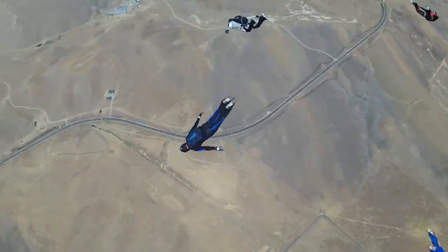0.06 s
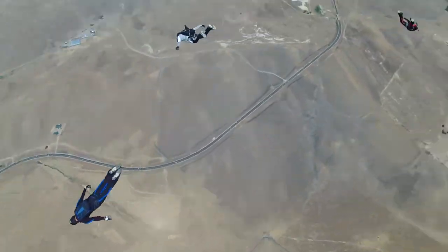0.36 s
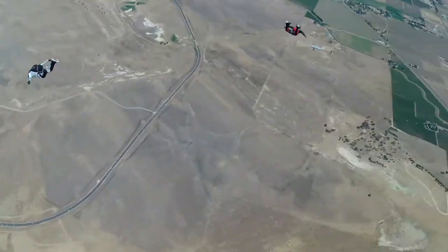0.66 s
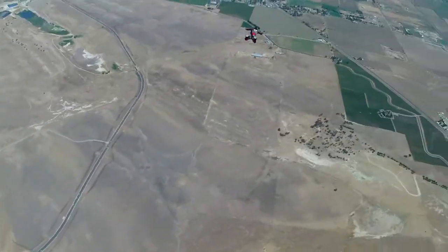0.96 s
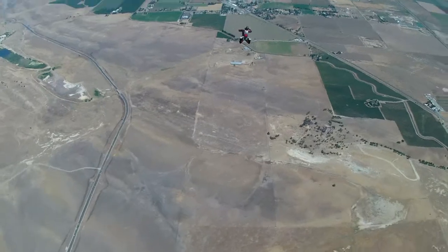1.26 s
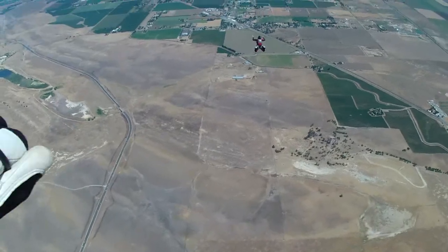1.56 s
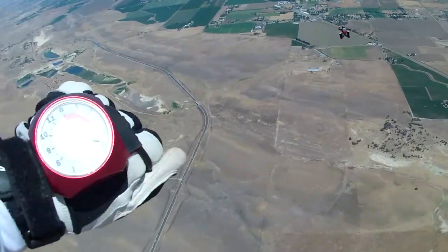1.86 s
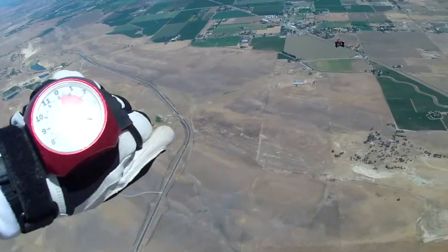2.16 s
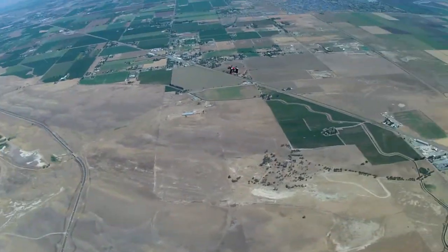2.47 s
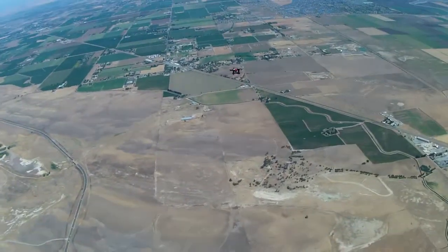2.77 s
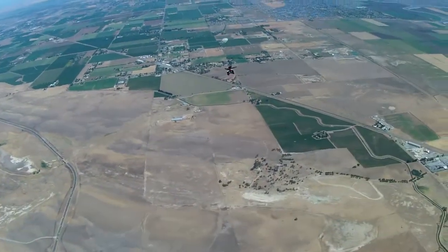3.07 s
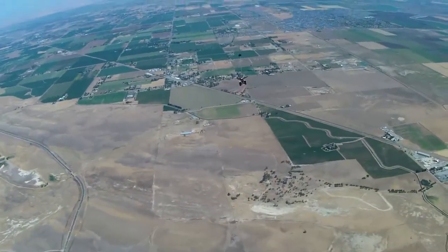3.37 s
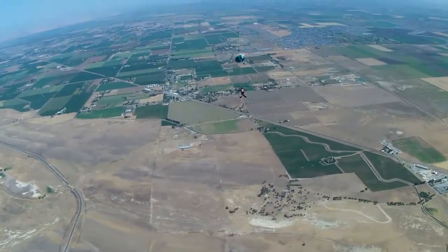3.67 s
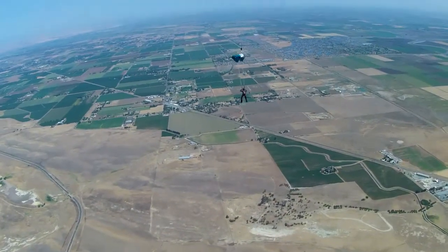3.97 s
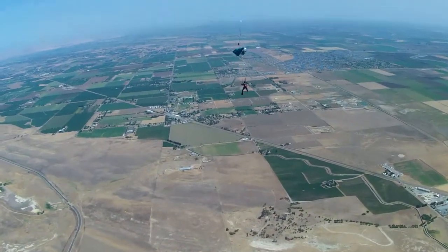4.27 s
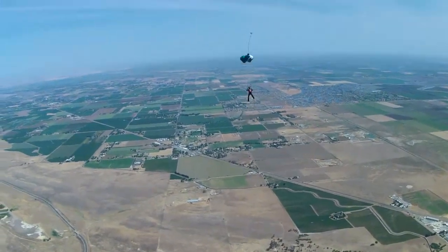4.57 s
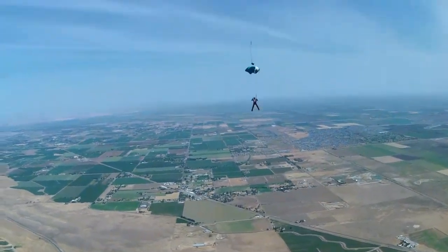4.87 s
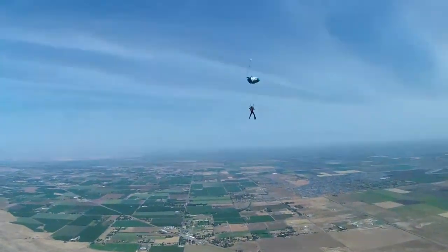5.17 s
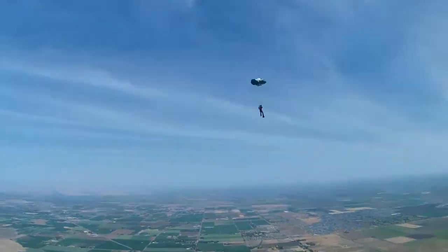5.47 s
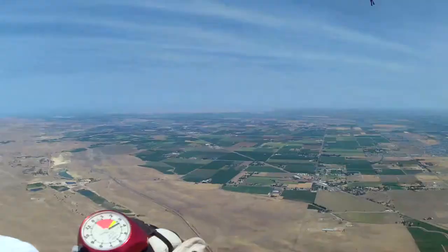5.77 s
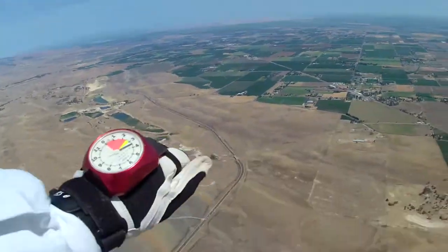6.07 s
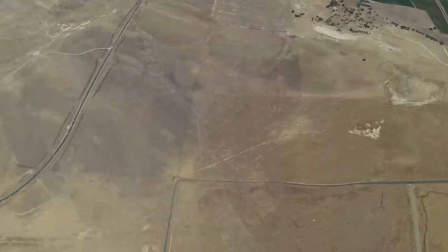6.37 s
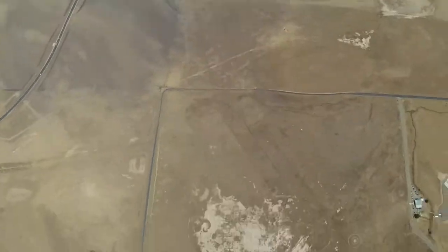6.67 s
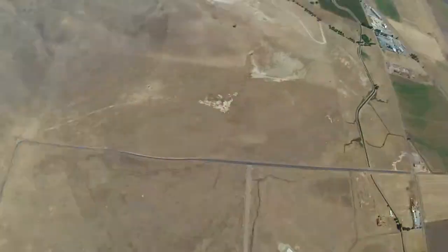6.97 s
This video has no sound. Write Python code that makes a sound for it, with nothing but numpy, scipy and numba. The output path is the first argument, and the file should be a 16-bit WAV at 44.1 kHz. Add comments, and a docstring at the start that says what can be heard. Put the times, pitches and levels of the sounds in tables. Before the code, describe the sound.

Loud freefall wind hisses over an overloaded helmet microphone, breaks into a buffeting rumble, then surges back to a hard hiss.

```python
"""Freefall wind on a skydiver's helmet camera: eddies ring the microphone port and overload the capsule.
It opens on the hard hiss of the full stream, with a whoosh at 0.6 s as the head turns. The port ducks
into the body's wake around 2 s, comes out, and sinks back at 2.8 s. Eddies there are large and slow, so
the rush breaks up into a buffeting rumble, deepest from 5.3 to 5.7 s. By 6.3 s the hard hiss is back,
and a last quick whoosh at 7 s drops into a duller rush."""
import sys
import numpy as np
from scipy import signal
from scipy.fft import rfft, irfft
from scipy.io import wavfile
from numba import njit

SR = 44100
rng = np.random.default_rng(int(sys.argv[2]) if len(sys.argv) > 2 else 0)


def generate_wav(signal):
    """Clip the signal to [-1, 1] and save it as 16-bit WAV at the path in sys.argv[1]."""
    frames = np.transpose(np.atleast_2d(signal))
    scaled = np.clip(frames, -1, 1) * 32767
    pcm = np.round(scaled).astype(np.int16)
    wavfile.write(sys.argv[1], SR, pcm)


N = 318402

# air at the port as the head turns: (time [s], base eddy rate [Hz], base push [dB re capsule overload])
AIRFLOW = [(0.435, 1720, 2.5), (0.475, 4540, 1), (0.6, 2700, 0.5), (1.4, 2650, 1.5), (1.8, 3180, 1),
           (1.85, 1190, 1), (2.2, 1260, 3), (2.28, 2500, 2), (2.765, 2740, 1), (2.805, 960, 1.5),
           (3.0, 746, 1.5), (3.06, 1170, 2), (3.7, 1350, 2.5), (4.22, 1160, 2.5), (4.4, 835, 4),
           (4.9, 535, 2.5), (5.3, 303, 2), (5.7, 252, 2), (5.82, 597, 4), (6.0, 1490, 3), (6.22, 1220, 2),
           (6.31, 2800, 2.5), (6.76, 3280, -3.5), (6.87, 2650, 1.5), (6.955, 3400, 2), (6.985, 2090, -0.5),
           (7.05, 1300, -2), (7.2, 1360, 1)]
# the big gusts (+) and lulls (-) in the wake: (centre [s], half length [s], air speed change [dB])
GUSTS_AND_LULLS = [(3.223, 0.043, 5.5), (4.633, 0.015, -7), (4.72, 0.008, 10), (4.819, 0.021, -7.5),
                   (4.839, 0.024, 7), (4.933, 0.015, -7.5), (4.963, 0.027, 2.5), (4.991, 0.011, -8),
                   (5.143, 0.012, 6), (5.242, 0.0064, 10), (5.301, 0.0076, 6.5), (5.324, 0.019, -2.5),
                   (5.371, 0.0046, 4), (5.434, 0.0082, 4), (5.459, 0.005, 11), (5.491, 0.014, -7),
                   (5.542, 0.018, -7), (5.599, 0.018, -6.5), (5.615, 0.0065, 7.5), (5.647, 0.017, -5),
                   (5.673, 0.0023, 6), (5.711, 0.012, 6), (5.757, 0.012, 4), (5.775, 0.0029, 7),
                   (7.078, 0.049, -7.5)]
# quick head turns let clean air over the case edge: (centre [s], half length [s], vortex tone lift [dB])
HEAD_WHOOSHES = [(0.563, 0.21, 3.5), (6.993, 0.08, 11)]
# tone colour of the camera case: (frequency [Hz], gain [dB])
CASE_EQ = [(30, -0.5), (100, -1.5), (250, -1.5), (600, 0), (1500, 0), (3000, 0.5), (5000, -1), (7500, -1.5),
           (11000, -2), (15000, -1.5)]

OPEN_HZ, WAKE_HZ, STALL_HZ = 3270, 990, 550  # eddy rate: full stream, behind the body, shedding stalled


def wind(sway_db=0.75, open_buffet_db=2.0, wake_buffet_db=3.5, open_flutter_db=0.5, deep_flutter_db=1.14):
    """The stream: its speed sets both how fast the eddies pass and how hard they push."""
    t = np.arange(N) / SR
    times, rates_hz, pushes_db = np.transpose(AIRFLOW)
    mean_hz = np.exp(np.interp(t, times, np.log(rates_hz)))
    wake, deep = shelter(mean_hz, OPEN_HZ, WAKE_HZ), shelter(mean_hz, WAKE_HZ, STALL_HZ)
    mean_hz *= undb(sway_db * (1 - deep) * wander(hz=7))  # the head sways a little in the stream
    whoosh_db = swells(t, HEAD_WHOOSHES)
    jitter = wander(hz=130)
    surges = jitter + 0.06 * (jitter ** 2 - 1)  # brief surges outweigh the slack between them
    buffet_db = (open_buffet_db * (1 - wake) + wake_buffet_db * wake) * surges
    buffet_db *= undb(-whoosh_db)  # the clean air of a whoosh buffets less
    flutter_db = (open_flutter_db * (1 - deep) + deep_flutter_db * deep) * wander(hz=30)
    gust_db = swells(t, GUSTS_AND_LULLS) + flutter_db
    rush = eddies(mean_hz * undb(gust_db + buffet_db), wake)
    # even shedding needs clean air: it fades in the wake and stalls deep inside it
    tone_gain = undb(-8 - 10 * wake + whoosh_db) * (1 - deep)
    tone = vortex_tone(1.2 * mean_hz * undb(gust_db + 0.26 * buffet_db))
    push_db = np.interp(t, times, pushes_db) - 1.36 * wake + 0.44 * gust_db + 0.052 * wake * buffet_db
    pressure = (rush + tone_gain * tone) * undb(push_db)
    hiss = suit_hiss()
    return pressure + undb(-5) * wake * spits(pressure) + hiss


def eddies(hz, wake, stream_damping=1.55, wake_damping=1.0, stream_lows=0.6, wake_lows=0.65):
    """The body of the rush: passing eddies make a hump of noise at their rate, narrower in the wake."""
    noise = rng.standard_normal(N) * np.sqrt(SR / hz)
    pressure = 0
    for damping, lows, share in ((stream_damping, stream_lows, 1 - wake), (wake_damping, wake_lows, wake)):
        low, band = svf(noise, hz, damping)
        soft, edge = svf(band + lows * low, hz * 5.5, damping=2.)  # the finest eddies die out soonest
        pressure = pressure + share * unit(soft + edge)
    return pressure


def vortex_tone(hz):
    """Vortices peel off the case edge fairly evenly: a hollow, airy pitch that rides the air speed."""
    noise = rng.standard_normal(N) * np.sqrt(SR / hz)
    _, band = svf(noise, hz, damping=0.62)
    return unit(band)


def spits(pressure, threshold=1.74):
    """Under strong suction the flow tears off the port and spits a burst of fine turbulence."""
    tear = np.clip(-pressure - threshold, 0, 1)
    return tear * noise_band(hz=3200., damping=1.5)


def port(pressure, ring_hz=5440, width_hz=1360):
    """The air in the microphone port rings at one pitch and lets little through above it."""
    s = 1j * np.arange(N // 2 + 1) * SR / N / ring_hz
    return irfft(rfft(pressure) / (s * s + s * width_hz / ring_hz + 1), N)


def capsule(pressure, bias=0.63, give=0.12, give_hz=600., give_limit=2.6):
    """The crunch: the diaphragm runs into its limits, sooner on one side than on the other."""
    oversampled = signal.resample_poly(pressure, 2, 1)
    clipped = signal.resample_poly(np.tanh(oversampled + bias) - np.tanh(bias), 1, 2)
    # slow swings of pressure bend it somewhat further than fast ones
    low, band = svf(pressure, np.full(N, give_hz), damping=1.5)
    return clipped + give * give_limit * np.tanh((low + band) / give_limit)


def camera(x, bass_cut_hz=230, trim_db=-5.5):
    """The camera thins the bass gently and adds the colour of its case."""
    f = np.arange(N // 2 + 1) * SR / N
    hz, db = np.transpose(CASE_EQ)
    colour = undb(trim_db + np.interp(np.log(f + 1), np.log(hz), db))
    bass_cut = 1j * f / (1j * f + bass_cut_hz)
    return irfft(rfft(x) * colour * bass_cut, N)


def suit_hiss():
    """Air tearing past suit and helmet lays a bed of hiss, even when the port is sheltered."""
    return undb(-26) * rng.standard_normal(N)


def high_hiss():
    """A faint, steady high hiss, added after the port, evens out the top."""
    return undb(-36) * noise_band(hz=7500., damping=1.0)


def shelter(hz, outer_hz, inner_hz):
    """Slow air is sheltered air: 0 at the outer eddy rate, 1 at the inner."""
    return np.clip(np.log(outer_hz / hz) / np.log(outer_hz / inner_hz), 0, 1)


def swells(t, rows):
    """A curve in dB with one smooth swell or dip for each row."""
    return sum(db * np.cos(np.pi / 2 * np.clip((t - centre) / half, -1, 1)) ** 2
               for centre, half, db in rows)


def wander(hz):
    """Smooth random modulation at rms 1, moving up to about hz, with drift below 4 Hz rolled off."""
    f = np.arange(N // 2 + 1) * SR / N
    smooth = rfft(rng.standard_normal(N)) / np.sqrt(1 + (f / hz) ** 4)
    return unit(irfft(smooth * f / (f + 4), N))


def noise_band(hz, damping):
    """Steady band-passed noise at rms 1."""
    _, band = svf(rng.standard_normal(N), np.full(N, hz), damping)
    return unit(band)


@njit
def svf(x, hz, damping):
    """Sweepable state-variable filter: low-pass and band-pass outputs."""
    low, band = np.empty(len(x)), np.empty(len(x))
    low_state, band_state = 0., 0.
    for i in range(len(x)):
        g = np.tan(np.pi * min(hz[i], .4 * SR) / SR)
        band[i] = (band_state + g * (x[i] - low_state)) / (1 + g * (g + damping))
        low[i] = low_state + g * band[i]
        band_state, low_state = 2 * band[i] - band_state, 2 * low[i] - low_state
    return low, band


def unit(x):
    """Scale to rms 1."""
    return x / x.std()


def undb(db):
    """Decibels to gain."""
    return 10 ** (np.asarray(db) / 20)


def scene():
    """Wind through the port over a faint high hiss: one microphone, the same in both channels."""
    return np.tile(port(wind()) + high_hiss(), (2, 1))


def record(dry):
    """Overloaded capsule, camera colour and a steep cut at the top."""
    x = camera(capsule(dry[0]))
    top_cut = signal.firwin(501, cutoff=15380, window="blackman", fs=SR)
    return np.tile(signal.fftconvolve(x, top_cut, "same"), (2, 1))


dry = scene()
out = record(dry)
generate_wav(out)
```